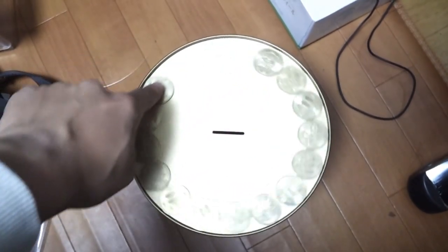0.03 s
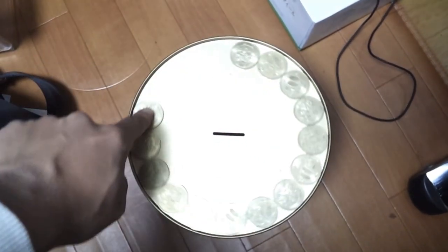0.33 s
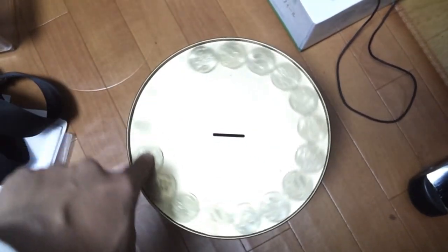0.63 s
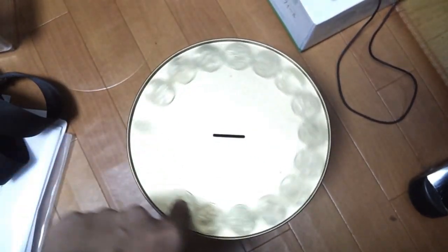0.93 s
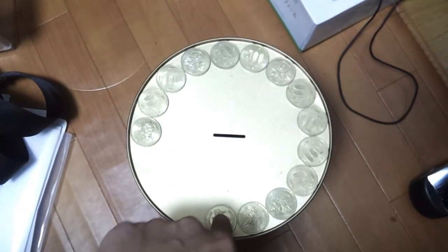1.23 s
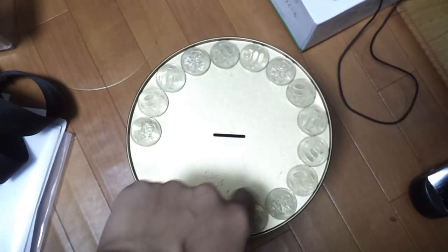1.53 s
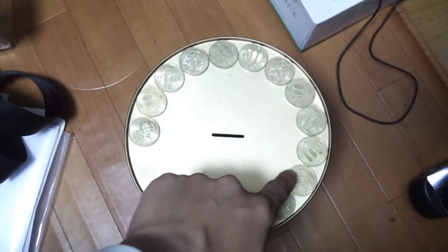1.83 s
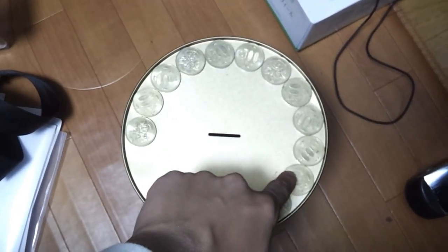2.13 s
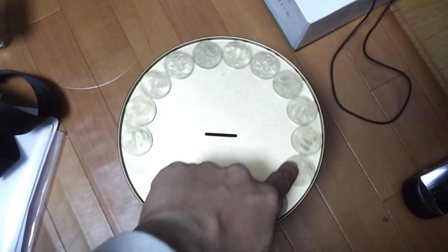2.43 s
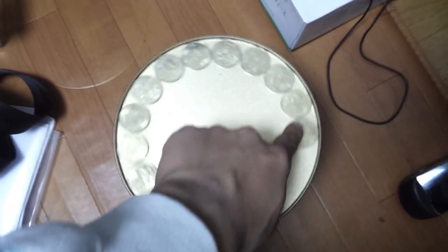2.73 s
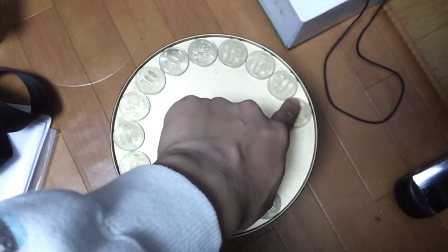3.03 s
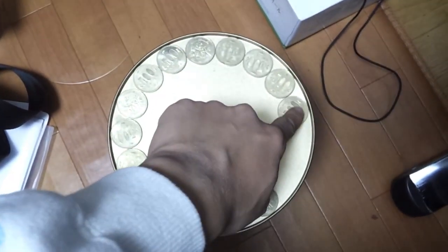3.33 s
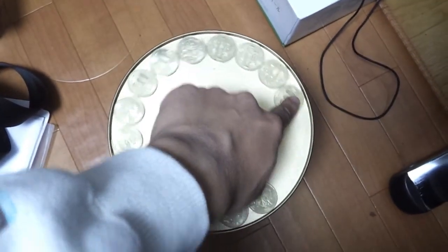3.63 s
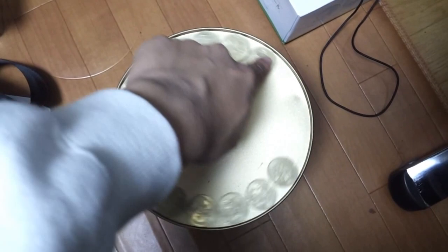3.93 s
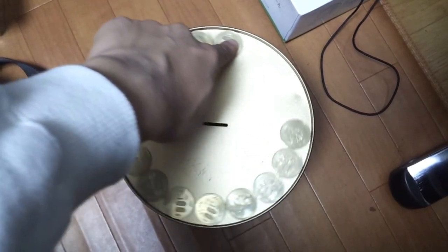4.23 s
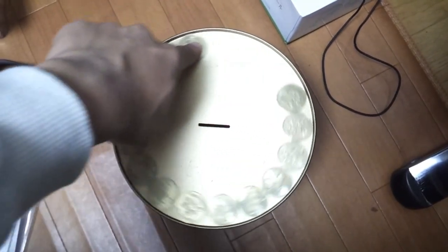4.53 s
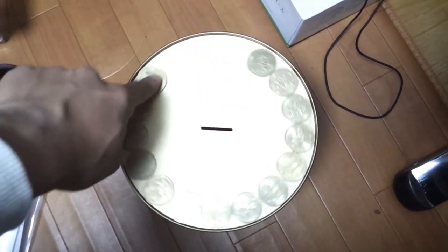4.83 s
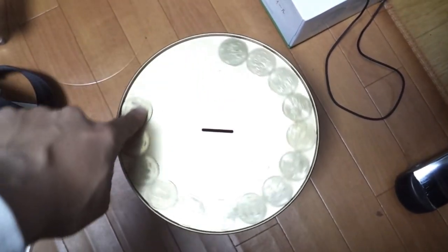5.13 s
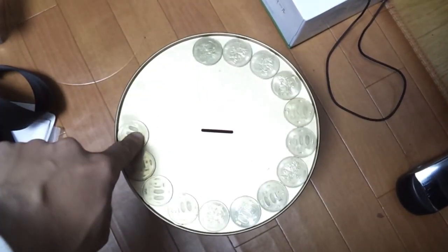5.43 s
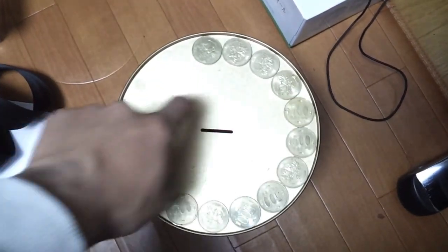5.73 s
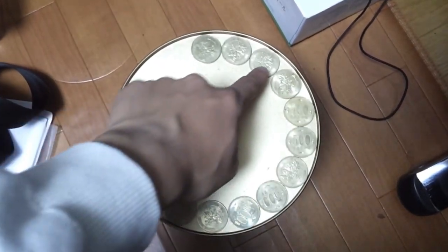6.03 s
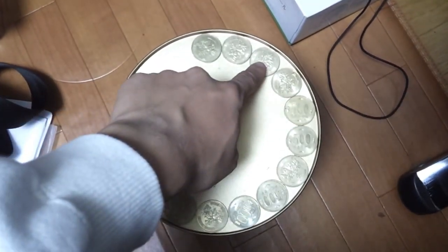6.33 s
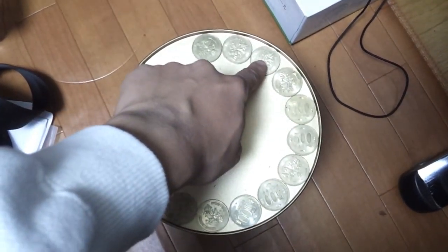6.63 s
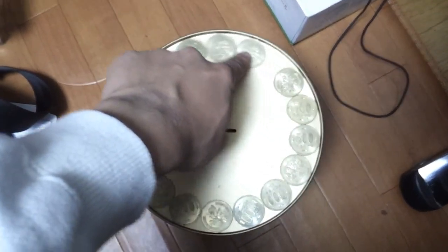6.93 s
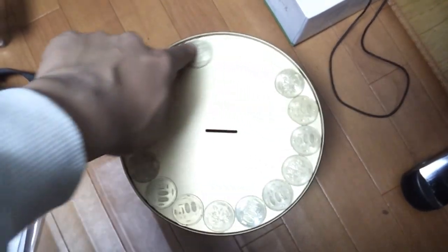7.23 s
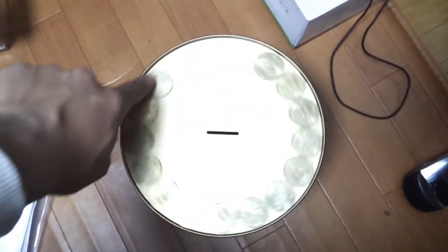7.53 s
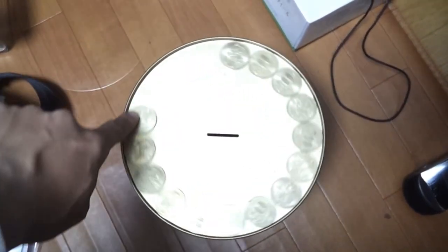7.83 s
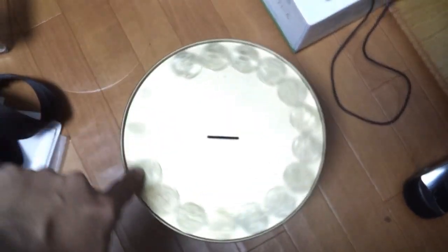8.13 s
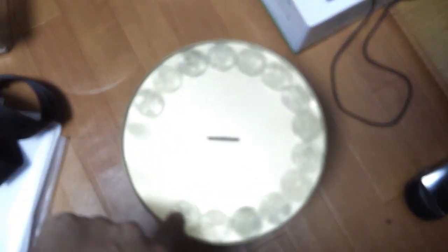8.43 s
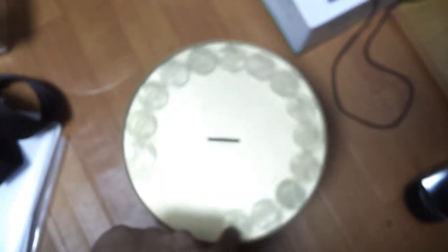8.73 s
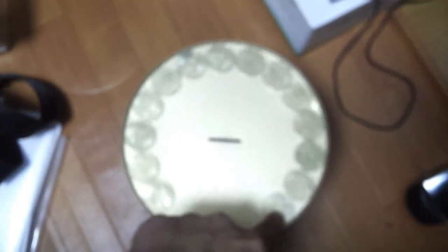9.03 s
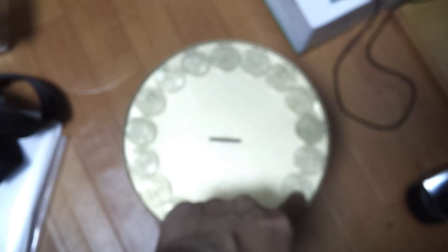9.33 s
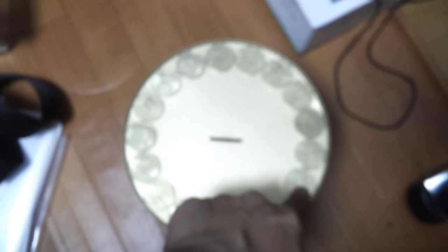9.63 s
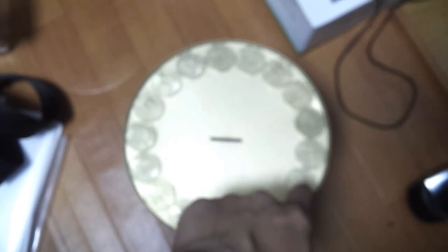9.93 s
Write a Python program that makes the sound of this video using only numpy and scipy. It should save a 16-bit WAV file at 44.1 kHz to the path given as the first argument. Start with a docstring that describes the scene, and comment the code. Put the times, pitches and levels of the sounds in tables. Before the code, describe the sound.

Coins slide round a tin lid in four scraping, hissing sweeps, with small metallic clinks and short pauses in a quiet room.

```python
"""In a quiet, humming room, a flat tin lid lies on a wooden floor, heard close and in stereo.
A finger pushes a row of coins round its rim in four sweeps. Countless tiny catches of metal on metal
ring the sheet, while milled edges burr and zip along the rim. The coins chatter as they bump
each other, and one drops flat in a pause."""
import sys
import numpy as np
from scipy import signal
from scipy.fft import rfft, irfft
from scipy.io import wavfile

SR = 44100
rng = np.random.default_rng(int(sys.argv[2]) if len(sys.argv) > 2 else 0)


def persist_wave(psi):
    """Save psi, clipped to +-1, as 16-bit WAV."""
    counts = np.round(np.clip(psi, -1, 1) * 32767).astype(np.int16)
    wavfile.write(sys.argv[1], SR, np.atleast_2d(counts).T)


N = 440559
T = np.arange(N) / SR
FFT_SIZE = 16384
HZ = np.maximum(np.fft.rfftfreq(FFT_SIZE, 1 / SR), 1)
SIDES = np.array([[.5], [-.5]])  # splits a difference between left and right


def undb(db):
    """Decibels to gain."""
    return 10 ** (np.asarray(db) / 20)


def curve(points):
    """A table of (freq_hz, value) points drawn across the spectrum."""
    hz, value = np.transpose(points)
    return np.interp(np.log(HZ), np.log(hz), value)


def bell(hz, width):
    """Gain of a steep resonance, 1 at its centre."""
    return 1 / (1 + ((HZ / hz - hz / HZ) * hz / width) ** 2 / 2)


def resonances(modes):
    """Gain of several (pitch_hz, width_hz, level_db) resonances together."""
    return np.sqrt(sum((undb(db) * bell(hz, width)) ** 2 for hz, width, db in modes))


def unit(gain, band=True):
    """Scale a filter so that white noise leaves it with rms 1 inside a band."""
    return gain / np.sqrt(np.mean(gain ** 2 * band))


def eq(x, gain):
    """Minimum-phase EQ with the given gain curve, built by way of the cepstrum."""
    cepstrum = irfft(np.log(gain + 1e-5))
    cepstrum[..., 1:FFT_SIZE // 2] *= 2
    cepstrum[..., FFT_SIZE // 2 + 1:] = 0
    response = irfft(np.exp(rfft(cepstrum)))
    return signal.oaconvolve(np.atleast_2d(x), np.atleast_2d(response), axes=1)[:, :N]


def drift(rate_hz):
    """Smooth random modulation with a spread near 1."""
    knots = rng.standard_normal(int(N / SR * rate_hz) + 2)
    return np.interp(T * rate_hz, np.arange(len(knots)), knots)


# Colour of the room's air: freq_hz, gain_db
AIR_EQ = [(13, -34), (22, -8.5), (60, -15), (122, -10.5), (160, -10.5), (193, 1.5), (215, -9), (247, -5),
          (473, -17.5), (621, -14), (1370, -29), (6960, -31.5), (7760, -29.5), (8420, -32), (14500, -36.5)]
# Hums and a thin whine in the room: pitch_hz, width_hz, level_db
ROOM_HUM = [(191, 10, -55), (225, 13, -61.5), (1120, 350, -63.5), (3370, 60, -87), (7960, 5, -81)]
# How alike the room sounds on both sides: freq_hz, correlation
ROOM_LIKENESS = [(30, 0.22), (90, 0.2), (190, 0.98), (600, 0.54), (1200, 0), (3000, 0), (14000, 0)]
# Lean of the room tone: freq_hz, left_minus_right_db
ROOM_PAN = [(30, 9.5), (80, 15), (170, 4.5), (400, 2.5), (2000, 1)]
def room_tone(air_db):
    """A steady bed of air with a low hum and a thin whine; the lowest rumble lies on the left."""
    air = undb(air_db) * unit(undb(curve(AIR_EQ)))
    hum_power = sum((undb(db) * unit(bell(hz, width))) ** 2 for hz, width, db in ROOM_HUM)
    gain = np.sqrt(air ** 2 + hum_power)
    alike = np.clip(curve(ROOM_LIKENESS), 0, 1)
    mid = eq(rng.standard_normal(N), gain)
    side = eq(rng.standard_normal(N), gain * np.sqrt((1 - alike) / (1 + alike)))
    lean = undb(SIDES * curve(ROOM_PAN))
    return eq(mid + 2 * SIDES * side, lean / lean.mean(axis=0))


def lid_spots(t60_s, crack, crack_s, alike_hz, count=8, samples=7000):
    """Ring of the lid struck at several spots: the same dense modes, mixed anew for each spot and ear."""
    t = T[:samples]
    hz = np.arange(100, 15000, 24.)
    hz += rng.uniform(-8.5, 10.3, len(hz))
    shared = rng.standard_normal((count, 1, len(hz)))
    per_ear = rng.standard_normal((count, 2, len(hz)))
    shapes = shared + per_ear * (hz / alike_hz + 0.15)  # long waves reach both ears alike
    shapes /= np.sqrt(np.mean(shapes ** 2, axis=0))
    ring = shapes @ np.sin(2 * np.pi * (np.outer(hz, t) + rng.random((len(hz), 1))))
    attack = 1 + crack * np.exp(-t / crack_s)  # the first wave leaves before the whole sheet rings
    ring *= np.exp(-np.log(1000) * t / t60_s) * attack
    return ring / np.sqrt(np.sum(ring ** 2, axis=2, keepdims=True))


def ring_lid(forces, spots):
    """Each force drives the lid at its own spot."""
    return sum(signal.oaconvolve(force[None], spot, axes=1)[:, :N] for force, spot in zip(forces, spots))


# Colour that the tin sheet radiates: freq_hz, gain_db
SHEET_EQ = [(250, -53.5), (420, -15.5), (706, 0.5), (908, -6), (1070, -6), (1170, -7), (1660, 1.5),
            (2080, -7.5), (2560, -3.5), (2830, -4.5), (5250, -3), (6040, -1.5), (6750, -1), (10000, -13),
            (12000, -27.5), (15600, -96), (22000, -120)]
# Peaks and dips in that colour: freq_hz, width_hz, boost_db
SHEET_PEAKS = [(398, 100, -6), (700, 76, -3.5), (856, 110, -1.5), (1050, 73, 3), (1340, 190, 3),
               (1626, 140, -2.5), (2294, 210, 3.5), (6840, 200, 1.5)]
def sheet_bands(crossover_hz=2950):
    """The sheet's colour, split into its low body and its high hiss."""
    peaks_db = sum(db * bell(hz, width) for hz, width, db in SHEET_PEAKS)
    gain = undb(curve(SHEET_EQ) + peaks_db)
    low_share = 1 / (1 + (HZ / crossover_hz) ** 6)
    return gain * np.sqrt(low_share), gain * np.sqrt(1 - low_share)


def rattles(hits, spots, first_blow, bounces_per_s, fade, ring_s=0.014):
    """A blow and quick, shrinking bounces per hit; returns the mix and a send set by the last column."""
    mix, send = np.zeros((2, 2, N))
    for k, (start_s, level_db, length_s, send_db) in enumerate(hits):
        chance, polarity = rng.random((2, SR // 10))
        n = int(np.clip(length_s * SR, 2, len(chance)))
        bounces = (chance[:n] < bounces_per_s / SR) * np.sign(polarity[:n] - .5)
        force = bounces * np.exp(-fade * np.arange(n) / n)
        force[0] = first_blow
        hit = signal.fftconvolve(force[None], spots[k % len(spots)], axes=1)
        hit *= undb(level_db) * np.sqrt(2 * ring_s * SR / np.sum(hit ** 2))
        start = int(start_s * SR)
        span = slice(start, start + hit.shape[1])
        mix[:, span] += hit
        send[:, span] += hit * undb(send_db)
    return mix, send


# The coins' own modes, damped by lying flat: pitch_hz, width_hz, level_db
COIN_MODES = [(7500, 1200, 0), (13350, 330, -7)]
# Coin bumps coin and their milled edges chatter: start_s, level_db, length_s, coin_send_db
COIN_BUMPS = [(3.113, -51, .006, -2), (3.144, -50, .006, -6), (3.4696, -39, .011, 1),
              (3.7669, -18, 0.01, 4.5), (3.795, -19, 0.017, 7.5), (3.818, -18.5, 0.0062, -1),
              (6.7222, -42.5, .005, 1), (6.7525, -39, .011, 0), (6.8785, -35, .005, 8),
              (6.904, -32, .006, 4), (7.3957, -26, .007, 7), (7.4037, -12, 0.0091, -1)]
def coin_bumps(spots, top_db, body_db, coin_db):
    """Edge against edge rings the coins themselves, and the sheet under them less."""
    chatter, coin_send = rattles(COIN_BUMPS, spots, first_blow=0.99, bounces_per_s=1500, fade=.3)
    low, high = sheet_bands()
    sheet = undb(top_db) * unit(high) + undb(body_db) * unit(low)
    return eq(chatter, sheet) + undb(coin_db) * eq(coin_send, unit(resonances(COIN_MODES)))


# Low lid modes that a landing coin sets ringing: pitch_hz, width_hz, level_db
KNOCK_MODES = [(696, 14, -14), (820, 61, 9.5), (1100, 78, -4), (1340, 48, -7), (2180, 47, -9)]
def lid_knocks(landings):
    """The low modes of the lid, struck once by every landing coin."""
    t = T[:FFT_SIZE]
    ring = sum(undb(db) * np.exp(-np.pi * width * t) * np.cos(2 * np.pi * hz * t)
               for hz, width, db in KNOCK_MODES)
    knocks = np.zeros(N)
    for start_s, level_db, _, body_send_db in landings:
        start = int(start_s * SR)
        knocks[start:start + len(ring)] += undb(level_db + body_send_db) * ring
    return knocks


# A coin tips and lands on the sheet: start_s, level_db, length_s, body_send_db
COIN_LANDINGS = [(1.471, -49, .025, 5), (1.498, -46, 0.015, 9), (2.91, -31, .004, -7),
                 (5.659, -22, 0.0048, 6.5), (5.6644, -28, 0.0016, -4), (6.074, -47, .006, 3),
                 (7.438, -16.5, .006, -6), (8.578, -25, 0.013, 1), (8.727, -35, .01, -1)]
def coin_landings(spots, body_db, knock_db, coin_db, shelf_db):
    """A coin landing flat hits harder than a catch: more top, and a knock from the sheet's low modes."""
    clatter, body_send = rattles(COIN_LANDINGS, spots, first_blow=2.0, bounces_per_s=2800, fade=0.66)
    low, high = sheet_bands()
    shelf = undb(curve([(6500, 0), (11000, shelf_db)]))
    top = eq(clatter, unit(high) * shelf + undb(coin_db) * unit(resonances(COIN_MODES)))
    body = undb(body_db) * eq(body_send, unit(low))
    knock = undb(knock_db) * eq(lid_knocks(COIN_LANDINGS), low)
    return top + body + knock


def milled_edge(pitch_hz, wobble_octaves):
    """Force of a coin's ridges rolling at an unsteady rate, rms 1."""
    ridge_hz = pitch_hz * 2 ** (wobble_octaves * drift(rate_hz=600))
    return np.sqrt(2) * np.sin(2 * np.pi * np.cumsum(ridge_hz) / SR)


# A coin spins against the rim: middle_s, length_s, pitch_hz, level_db
COIN_ZIPS = [(0.471, 0.15, 2130, -40), (3.70, .13, 1075, -33.5), (5.232, .08, 2180, -33.5),
             (7.94, .07, 2080, -34), (8.12, .3, 1195, -34)]
def coin_zips(spots, sag_octaves):
    """A spinning coin zips for a moment, swelling and fading, its pitch sagging as it slows."""
    forces = []
    for middle_s, length_s, pitch_hz, level_db in COIN_ZIPS:
        along = np.clip((T - middle_s) / length_s, -.5, .5)
        swell = undb(level_db) * np.cos(np.pi * along) ** 2
        forces.append(swell * milled_edge(pitch_hz * 2 ** (-sag_octaves * along), wobble_octaves=.18))
    return ring_lid(forces, spots)


def rim_burr(spots, push, level_db, creep_hz, rise_hz, cruise_db):
    """Two coins roll along the rim, touching it more or less; their burr rises and swells with speed."""
    speed = np.sqrt(push / undb(cruise_db))  # 1 at the usual sliding speed
    forces = []
    for _ in range(2):
        pitch_hz = (creep_hz + rise_hz * speed) * 2 ** (.2 * drift(rate_hz=4))
        contact = undb(level_db + 3 * drift(rate_hz=5))
        forces.append(milled_edge(pitch_hz, wobble_octaves=.25) * contact * push)
    return ring_lid(forces, spots)


# Four sweeps, each a list of envelope points; faster is louder: time_s, level_db
SWEEPS = [
    [(0.0, -27.5), (0.02, -26.0), (0.36, -38.5), (0.46, -28.5), (0.8, -22.5), (0.89, -24), (0.97, -20.5),
     (1.11, -19.5), (1.19, -23.5), (1.27, -43.5), (1.29, -43.5), (1.34, -65.0)],
    [(2.32, -59), (2.37, -47.5), (2.56, -28.5), (2.76, -23.5), (2.9, -33.0), (2.96, -31), (3.04, -48.0),
     (3.07, -61.5)],
    [(3.58, -59.5), (3.61, -45.0), (3.67, -28), (3.72, -22.5), (3.98, -26.0), (4.02, -21.5), (4.27, -32.5),
     (4.46, -25.5), (4.77, -19.0), (4.95, -30.0), (4.98, -27.0), (5.16, -30.5), (5.25, -26.5),
     (5.38, -31.5), (5.42, -39.0), (5.48, -63.0)],
    [(6.81, -59.5), (6.83, -46), (6.98, -29.5), (7.01, -32.5), (7.15, -22), (7.31, -27.5), (7.42, -27.5),
     (7.45, -20), (7.63, -24), (7.85, -32.0), (7.91, -24.5), (8.37, -22.0), (8.49, -28.0), (8.58, -19),
     (8.64, -22), (8.68, -31.5), (8.78, -16.0), (8.81, -21.5), (9.22, -32), (9.28, -30.5), (9.31, -36.5),
     (9.44, -40), (9.48, -45), (9.53, -67)],
]
def finger_push():
    """Envelope of the slide as the finger speeds up and slows down, silent between sweeps."""
    return sum(undb(np.interp(T, *np.transpose(sweep), left=-np.inf, right=-np.inf)) for sweep in SWEEPS)


def catches(per_s, scatter_db, judder_db, press_db):
    """One coin's tiny catches: mostly faint, a few sharp, in spurts as it is pressed more or less."""
    strength = undb(scatter_db * np.minimum(rng.exponential(size=N), 4))
    grip = undb(judder_db * drift(rate_hz=60) + press_db * drift(rate_hz=7))
    caught = rng.random(N) < per_s / SR
    force = caught * strength * rng.choice([-1, 1], N) * grip
    return force / np.std(force)


# The whole lid flexing like a drum skin: pitch_hz, width_hz, level_db
FLEX_MODES = [(209, 49, -10), (246.5, 41, 1.5), (299.3, 29.4, 1)]
def coin_scrape(spots, push, hiss_db, sing_db, body_db, flex_db):
    """The row of coins scrapes round; speed lifts the hiss most, the body less, the lid's flex least."""
    forces = [catches(per_s=1150, scatter_db=3.5, judder_db=2.4, press_db=1.53) for _ in spots]
    scrape = ring_lid(forces, spots) / np.sqrt(len(spots))
    scrape *= undb(0.46 * drift(rate_hz=22))  # the whole row moves in small jerks
    low, high = sheet_bands()
    low = unit(low, (HZ > 600) & (HZ < 2200))
    high = unit(high, (HZ > 4000) & (HZ < 10000))
    sing = unit(bell(*COIN_MODES[1][:2]))  # the upper coin mode
    # Above the knee the body gains only a share of each dB of push; the flex gains a share of the body's.
    knee_db, body_share, flex_share = -37, 0.58, 0.68
    body_swell = push * (1 + (push / undb(knee_db)) ** 2) ** ((body_share - 1) / 2)
    hiss = eq(scrape, undb(hiss_db) * high + undb(sing_db) * sing) * push
    body = undb(body_db) * eq(scrape, low) * body_swell
    flex = undb(flex_db) * eq(scrape, unit(resonances(FLEX_MODES))) * body_swell ** flex_share
    return hiss + body + flex


# Lean of the lid's sound: freq_hz, left_minus_right_db
LID_PAN = [(250, 3.5), (700, -0.5), (1400, 1), (2500, 1), (4000, 4.5), (6000, 11), (7500, 6), (9500, 0),
           (13000, -2.5)]
def scene():
    """Coins on the lid, leaning left in the treble, over the room tone."""
    spots = lid_spots(t60_s=0.12, crack=2.43, crack_s=0.00059, alike_hz=2530)
    push = finger_push()
    lid = coin_scrape(spots, push, hiss_db=0.9, sing_db=-30, body_db=-0.93, flex_db=-24.5)
    lid += rim_burr(spots, push, level_db=-20.0, creep_hz=719.5, rise_hz=300.1, cruise_db=-24)
    lid += coin_zips(spots, sag_octaves=0.15)
    lid += coin_landings(spots, body_db=-8.0, knock_db=-6.0, coin_db=-18, shelf_db=4.0)
    lid += coin_bumps(spots, top_db=-11.5, body_db=-13.0, coin_db=-4.5)
    left, right = eq(lid, undb(SIDES * curve(LID_PAN)))
    left = np.roll(left, 4)  # the lid reaches the left side 4 samples later
    return np.array([left, right]) + room_tone(air_db=-47)


def record(dry):
    """A soft clip rounds the very highest peaks, then a steep low-pass cuts the top."""
    ceiling, cutoff_hz = .82, 14700
    rounded = dry / (1 + (dry / ceiling) ** 6) ** (1 / 6)
    return signal.sosfilt(signal.ellip(8, .2, 70, cutoff_hz, fs=SR, output="sos"), rounded)


dry = scene()
out = record(dry)
persist_wave(out)
```